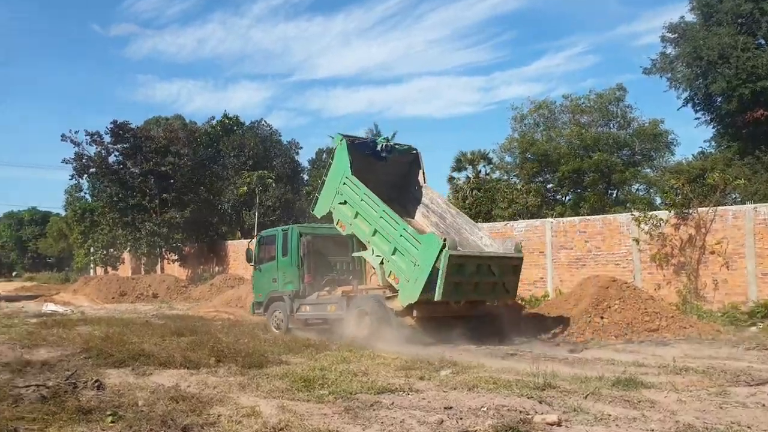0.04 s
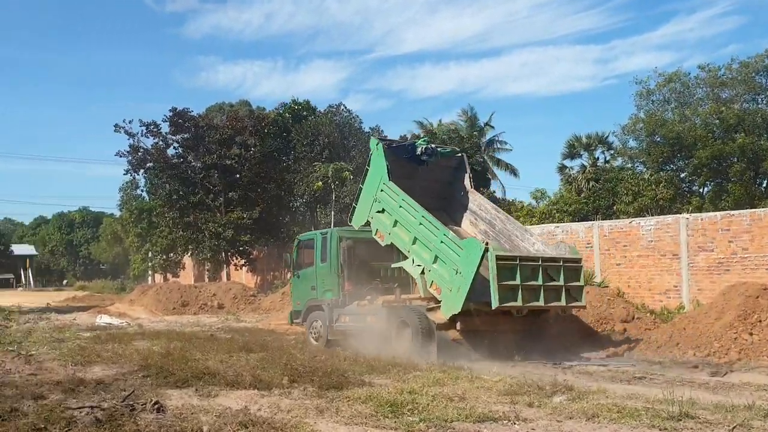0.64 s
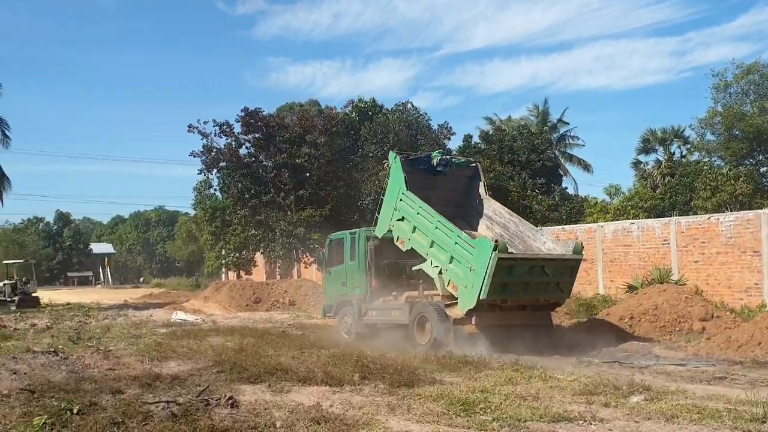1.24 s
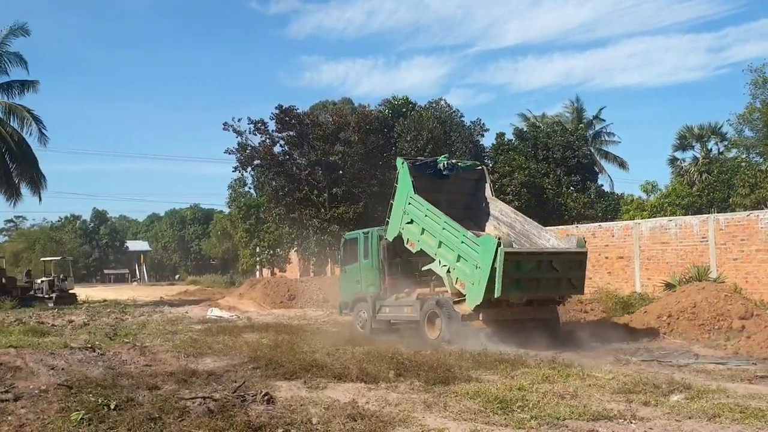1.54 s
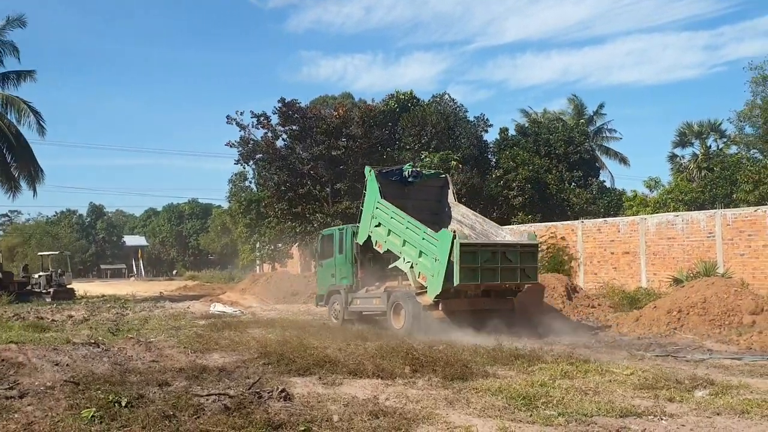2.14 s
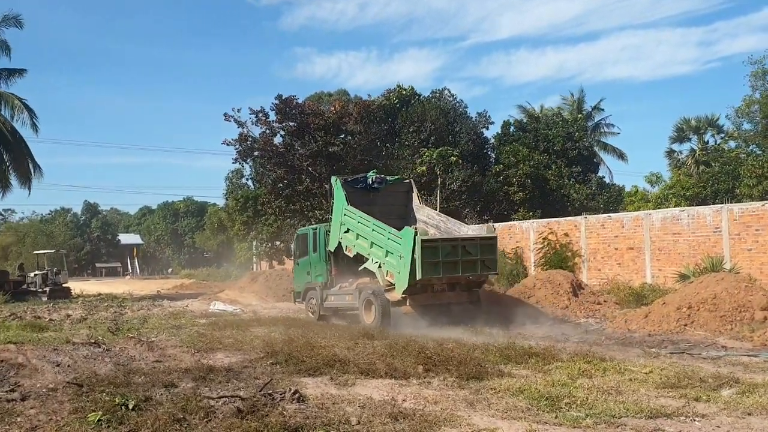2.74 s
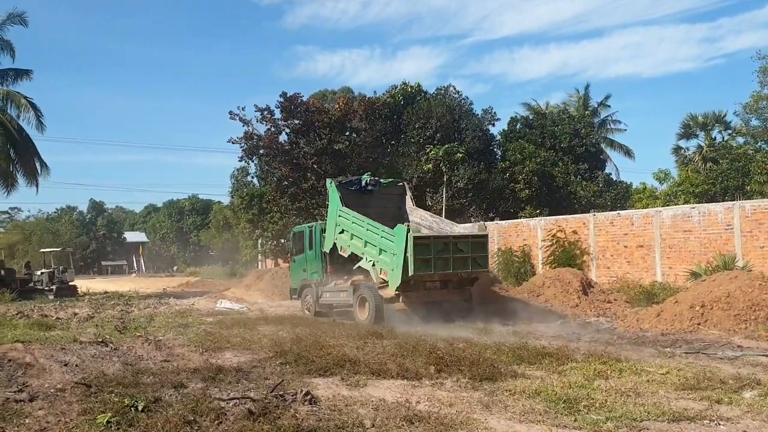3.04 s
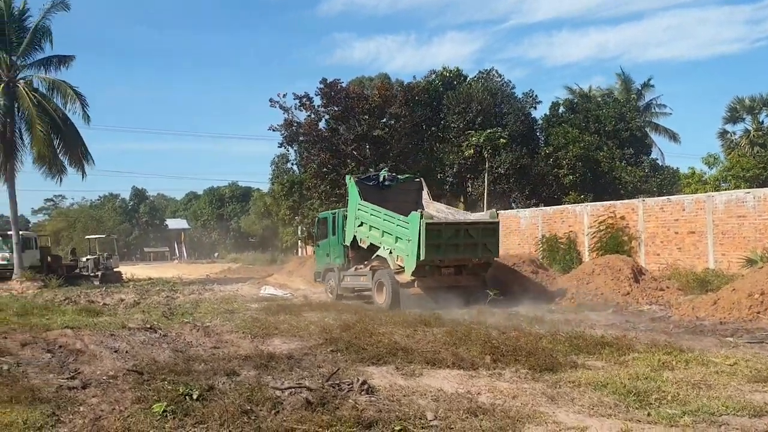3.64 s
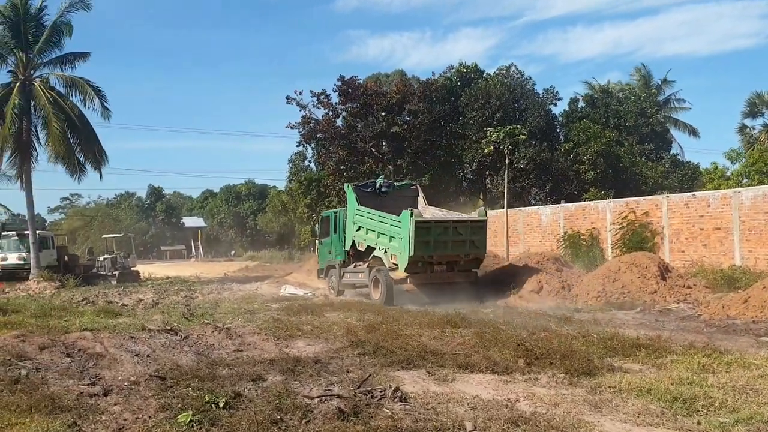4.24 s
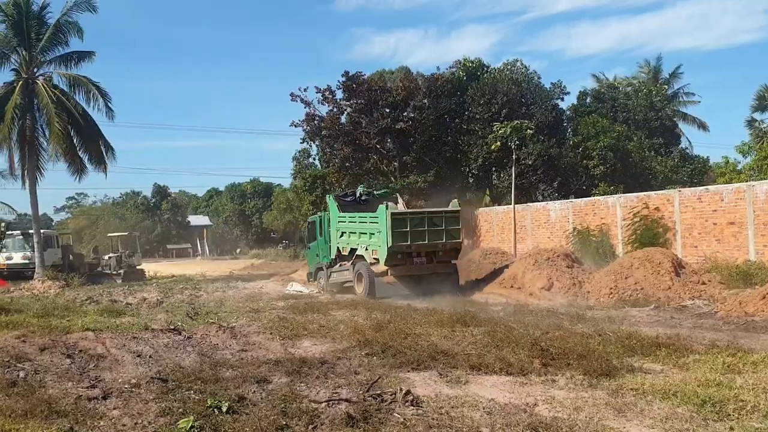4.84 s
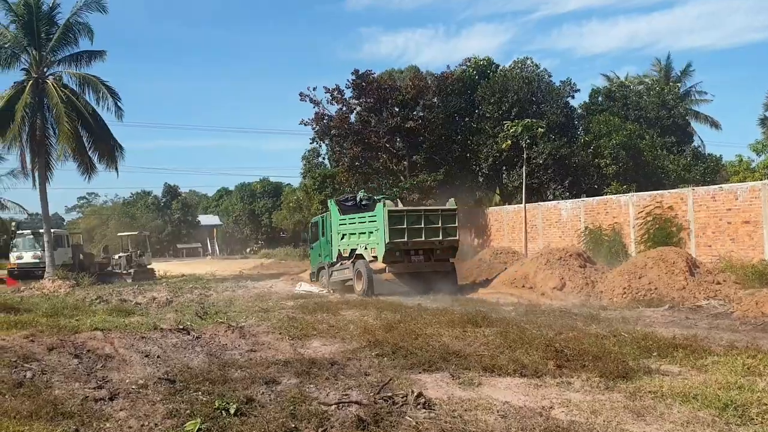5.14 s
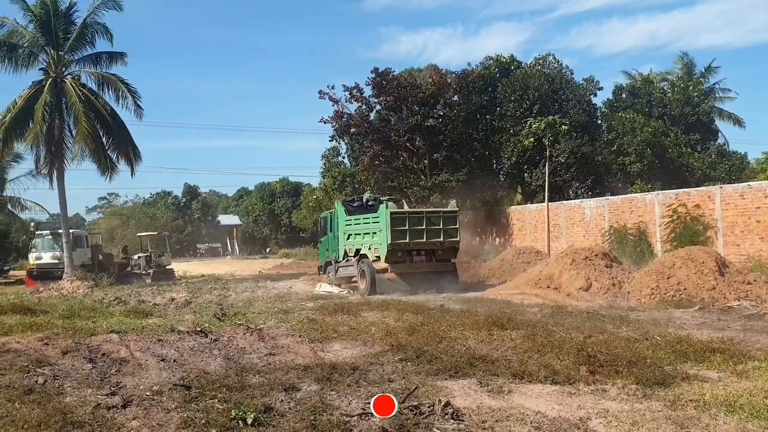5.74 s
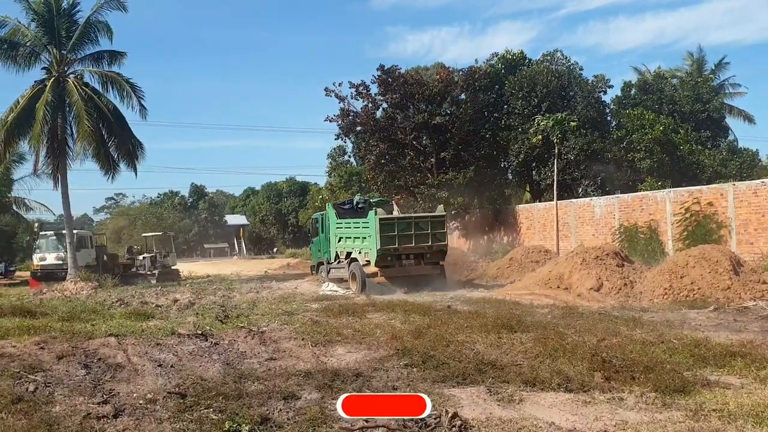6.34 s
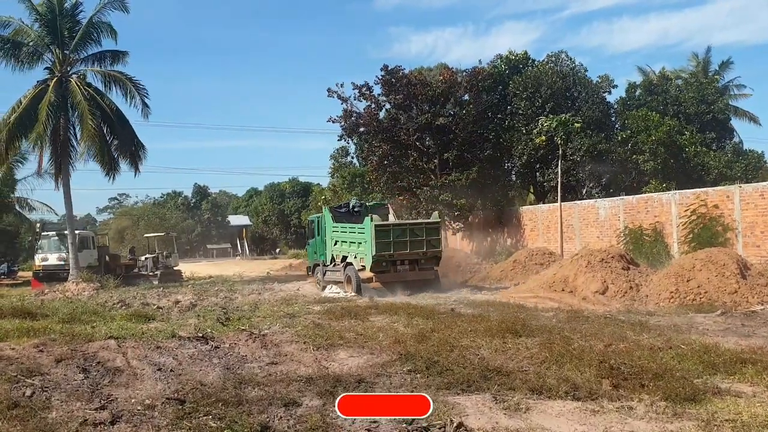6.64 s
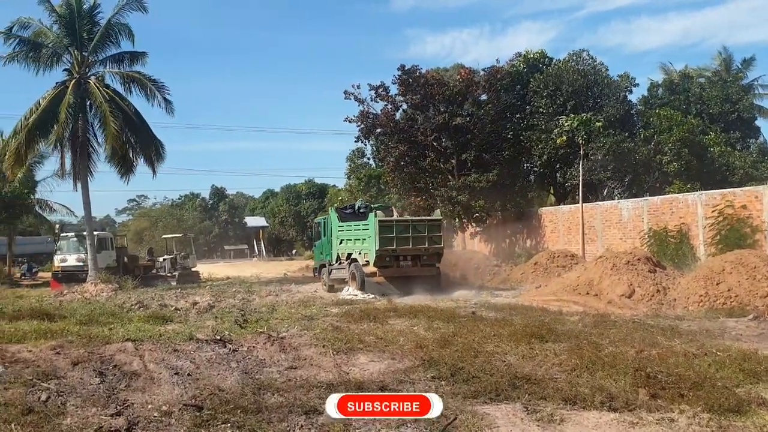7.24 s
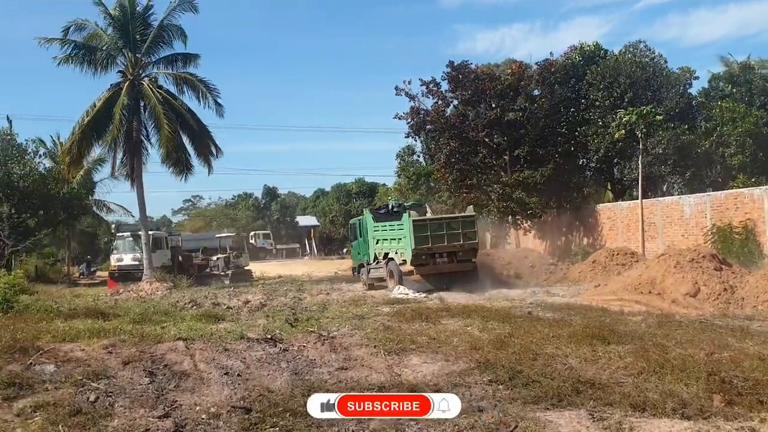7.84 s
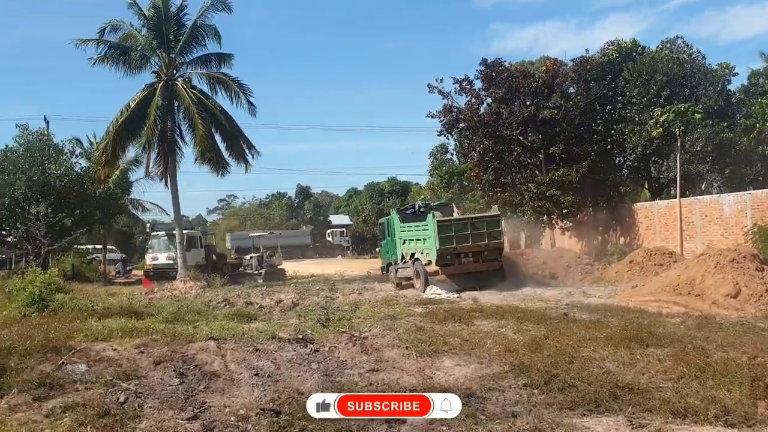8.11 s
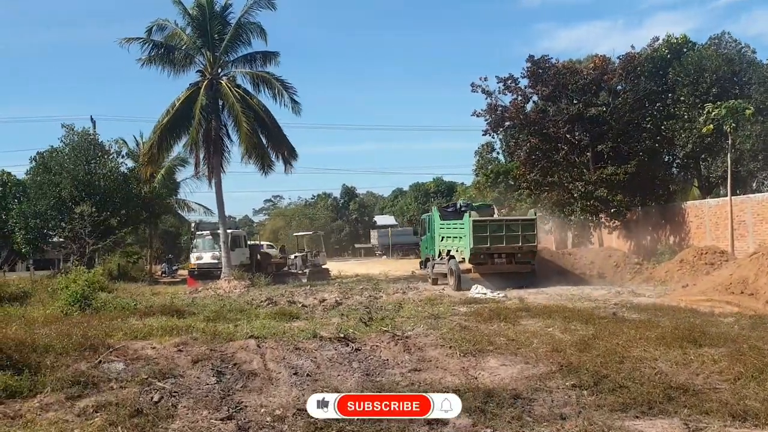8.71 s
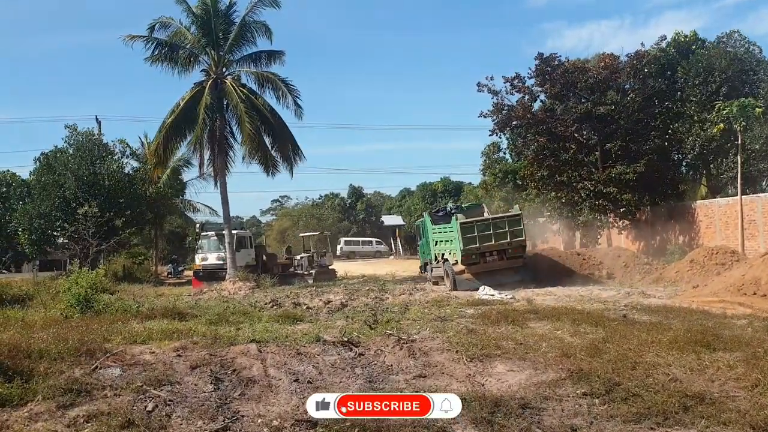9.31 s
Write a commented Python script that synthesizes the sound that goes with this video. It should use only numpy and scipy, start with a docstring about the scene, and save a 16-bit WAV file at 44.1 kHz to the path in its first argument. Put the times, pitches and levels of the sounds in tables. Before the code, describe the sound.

Heavy metal bangs ring out across an open yard as a dump truck's swinging tailgate strikes its bed, over a rumbling diesel and a soft hiss of sliding sand. The bangs come closer together and weaken as the gate settles, its hinges scraping briefly. Sharper, irregular clanks follow while the truck drives on. The sound sits a little right of the microphone, with a light echo.

```python
"""Dump truck tailgate slams

A dump truck jerks over rough ground with its bed raised, and the hanging steel tailgate slams against
the bed. The last sand slides out; as the bed comes down the gate bounces shut, its pins scrape, and it
clanks on its hooks at the bumps. The diesel pulls away, and a brick wall and trees answer the gate."""
import sys
import numpy as np
from scipy import signal
from scipy.fft import rfft, irfft, next_fast_len
from scipy.io import wavfile
from scipy.ndimage import uniform_filter1d, map_coordinates

SR = 44100
rng = np.random.default_rng(int(sys.argv[2]) if len(sys.argv) > 2 else 0)


def output_pcm(signal):
    """Save a mono or channel-first signal as 16-bit PCM at the path in sys.argv[1].

    Samples are clipped to [-1, 1] before scaling.
    """
    pcm = np.clip(np.atleast_2d(signal).T, -1, 1) * 32767
    wavfile.write(sys.argv[1], SR, np.round(pcm).astype(np.int16))


N = 413216

# stereo spread of the steel, and of the yard and truck noise: (frequency [Hz], side over mid [dB])
STEEL_WIDTH = [(60, -13.5), (300, -18.5), (700, -16), (1300, -5.5), (2400, -4.5), (4400, -4), (8000, 1),
               (15000, 0)]
AIR_WIDTH = [(30, 3), (100, -14), (300, -10.5), (1000, -4), (3000, -2.5), (12000, -1)]
# tone of the yard's tail: (frequency [Hz], relative level [dB])
YARD_COLOUR = [(40, -4), (150, 5.5), (600, -10.5), (1500, 1), (4000, -3), (12000, 10.5)]
# length of that tail: (frequency [Hz], t60 [s])
YARD_DECAY = [(80, 1.1), (500, 1.85), (1500, 0.58), (4000, 0.79), (12000, 0.34)]
# engine speed: (time [s], firing rate [Hz])
ENGINE_SPEED = [(0, 71), (1.1, 83), (2.4, 68.4), (3.2, 73.4), (4.2, 67), (5.8, 62.6), (6.15, 68), (6.7, 65),
                (7.1, 63), (7.8, 65.4), (9.37, 63)]
# how hard the truck pulls: (time [s], effort [dB])
EFFORT = [(0, 1.5), (1.0, -17), (2.0, -9), (3.3, -10.5), (4.2, -5.5), (5.6, -4.5), (6.35, -1), (7.1, -5),
          (8.1, 4), (9.37, -2.5)]
# exhaust, engine block, gears and pump: (multiple of the firing rate, relative level [dB])
EXHAUST_THROB = [(1, -13), (1.5, 7.5), (2, 3.5), (2.5, -28), (3, -20)]
BLOCK_DRONE = [(4, -1.5), (4.5, -15.5), (6, -21)]
GEAR_WHINE = [(8, -2), (16, -9.5), (23, -11)]
# noise colours of chassis, diesel, sand and air hiss, hinge pin: (frequency [Hz], relative density [dB])
RUMBLE_COLOUR = [(20, -28), (45, -1.5), (65, 7), (110, -2), (200, -0.5), (300, -10), (500, -28),
                 (1000, -48.5)]
CLATTER_COLOUR = [(150, 4.5), (380, 3), (700, 0.5), (1100, -6), (1600, -8), (2100, -9.5), (2600, -13),
                  (3400, -20.5), (5000, -23.5), (7200, -24.5), (9300, -31), (11500, -28), (15500, -55)]
HISS_COLOUR = [(400, -30), (750, 7), (1050, 12.5), (1500, 7), (2100, 2), (2650, 3.5), (3300, -3.5),
               (4200, -3.5), (5300, -8.5), (7300, -4), (9300, -14), (11500, -8.5), (15500, -13.5)]
PIN_COLOUR = [(2000, -24), (3100, 1), (3520, 7), (3950, -10), (5500, -24), (6700, -6), (7800, -37),
              (12000, -42)]
# sand hiss fades out by 5.4 s, then a faint background air hiss rises: (time [s], level [dB])
HISS_LEVEL = [(0, -50.5), (.9, -50.5), (1.3, -47), (1.9, -49), (2.05, -54.5), (3.3, -59.5), (4.2, -58.5),
              (5.4, -75), (9.37, -58)]
# dry hinge pins scrape as the gate settles: (time [s], level [dB], length [s])
SCRAPES = [(5.553, -45, .036), (5.693, -42, .022), (5.743, -43, .018)]
# clear ring of gate on bed, and of hooks and gate frame: (frequency [Hz], relative level [dB], t60 [s])
BED_MODES = [(88, -2, .3), (158, 1, .38), (240, -1.5, .35), (398, 0, .55), (440, -7, .45), (518, -1, .5),
             (623, -3, .5), (667, 1, .52), (868, -9, .45), (959, -6, .45), (1086, -11, .45),
             (1191, -11, .45), (1237, -13, .4), (1277, -12, .4), (1369, -13, .4), (1420, -12, .45),
             (1606, -12, .45), (1727, -15, .4), (1914, -13, .4), (2096, -13, .4), (2631, -15, .35),
             (2952, -15, .35), (3347, -17, .3), (3499, -17, .3), (4182, -18, .3)]
HOOK_MODES = [(198.4, -1.5, 0.65), (316, 0, 0.67), (530, -3.5, 0.88), (611, 0.5, 0.56), (686, 6, 0.32),
              (905, 1, 0.47), (998, 7, 0.26), (1090, 8, 0.21), (1200, 2.5, 0.075), (1370, 6.5, 0.12),
              (1434, 5.5, 0.12), (2024, -5.5, 0.36), (2270, 3, 0.12), (2605, 3, 0.29), (2643, 10, 0.092),
              (2910, -27, 0.15), (3135, 3, 0.086), (3300, -2.5, 0.094), (3960, 1, 0.072), (4710, -2, 0.1),
              (6100, -10, 0.15), (7000, -38, 0.2), (9995, -39, 0.17)]
# the wash of dense plate modes behind each ring: (frequency [Hz], relative density [dB])
BED_WASH = [(18, -48), (30, -32), (86, -0.5), (157, -5.5), (319, -5), (394, -6), (461, -6.5), (666, -3),
            (822, -9), (937, -6), (1130, -11), (4080, -20), (5040, -26), (14400, -39.5), (16000, -47)]
HOOK_WASH = [(30, -17), (80, 6.5), (300, -6.5), (700, 1.5), (1400, 0.5), (2100, -0.5), (2650, 2.5),
             (3800, -1.5), (5300, -9), (8000, -11), (9300, -22), (10800, -13), (13000, -23.5), (16000, -31)]
# decay of the wash, before a blow's sustain scales it: (frequency [Hz], t60 [s])
STEEL_DECAY = [(60, 1), (200, 0.39), (600, 0.78), (1500, 0.38), (3500, 0.24), (8000, 0.29), (15000, 0.14)]
# where the boom, panel, frame and edge bands meet: (frequency [Hz])
CROSSOVERS = [250, 760, 2200]
# a row for each of those bands: (level at strength 0 [dB], slope [dB per dB of strength])
CLANK_RESPONSE = [(-36.5, 0.98), (-35.5, 1), (-35.5, 0.87), (-29.5, 1)]
SLAM_RESPONSE = [(-22, 0.42), (-20.5, 1), (-25.5, 0.87), (-30.5, 1.21)]
# the loose gate knocks on its hooks and hinges: (time [s], strength [dB], contact [s])
CLANKS = [(2.131, -33, 0.0026), (5.192, -7.5, .016), (5.38, -10, 0.0063), (5.518, -17, 0.0069),
          (5.698, -12.5, 0.034), (5.744, -12.5, 0.0071), (5.846, -20, .016), (6.012, -11, 0.013),
          (6.229, -9.5, 0.042), (6.582, -10, 0.021), (6.824, -4, 0.019), (7.238, 0.5, 0.03),
          (8.029, 2, 0.025), (8.642, -24, 0.019), (8.793, 5, 0.032)]
# gate hits bed; landing askew adds clang: (time [s], strength [dB], clang [dB], contact [s])
SLAMS = [(-0.08, -0.5, 5.5, 0.01), (0.711, -38, -2, 0.045), (1.304, -4, 9, 0.044), (2.507, 7, 0.5, 0.023),
         (3.47, -0.5, 1.5, 0.029), (4.306, 0, 1, 0.026), (4.879, 3, .5, 0.025), (5.192, -2, -1, 0.031),
         (5.38, -10, -3.5, .008), (5.518, -13.5, -4, 0.011), (5.6, -22.5, -2, 0.013)]


def amp(db):
    """Decibels to gain."""
    return 10 ** (np.asarray(db) / 20)


def unit(x):
    """Scale to rms 1."""
    return x / np.sqrt(np.mean(x ** 2) + 1e-20)


def along(points, hz):
    """Read (frequency, value) points on a log axis."""
    freqs, values = np.transpose(points)
    return np.interp(np.log(hz + 1), np.log(freqs + 1), values)


def automation(points):
    """Draw (time, value) points out to one value a sample."""
    return np.interp(np.arange(N) / SR, *np.transpose(points))


def follow(drive_db, level_db, slope):
    """A level in dB that rides its drive at the given slope."""
    return level_db + slope * drive_db


def wobble(rate, size=N):
    """A smooth random curve, rate knots a second."""
    knots = rng.standard_normal(int(size * rate / SR) + 4)
    coarse = np.arange(0, size, 32)
    return np.interp(np.arange(size), coarse, map_coordinates(knots, [coarse * rate / SR]))


def filtered(x, response):
    """EQ x with a gain that depends on frequency."""
    size = x.shape[-1]
    padded = next_fast_len(size + 4096)
    return irfft(rfft(x, padded) * response(np.fft.rfftfreq(padded, 1 / SR)), padded)[..., :size]


def noise(colour, width, size=N):
    """Coloured noise as (mid, side), the mid at rms 1."""
    spread = lambda hz: np.array([np.ones_like(hz), amp(along(width, hz))])
    pair = filtered(rng.standard_normal((2, size)), lambda hz: amp(along(colour, hz)) * spread(hz))
    return pair / np.std(pair[0])


def dying(x, decay, hold):
    """After the hold time each frequency fades at its own speed."""
    hz, t, spectrum = signal.stft(x, SR, nperseg=256)
    fade = amp(-60 * np.maximum(t - hold, 0) / along(decay, hz)[:, None])
    return signal.istft(spectrum * fade, SR, nperseg=256)[1][:, :x.shape[-1]]


def add(track, time, sound):
    """Mix a sound in at a time that may lie before the start."""
    start = round(time * SR)
    part = sound[:, max(-start, 0):N - start]
    track[:, max(start, 0):][:, :part.shape[1]] += part


def steel_comb(depth_db, spacing_hz):
    """The fine, ragged EQ of a steel body's many close high resonances."""
    knots_hz = np.cumsum(spacing_hz * (1 + np.arange(700) / 300))
    peaks = np.clip(rng.standard_normal(len(knots_hz)), -2, 1.5)
    gain = amp(depth_db * peaks * np.minimum(knots_hz / 3500, 1))
    gain /= np.sqrt(uniform_filter1d(gain ** 2, size=12))
    return lambda hz: np.interp(hz, knots_hz, gain)


def yard(x, wet_db, bloom_s):
    """Wall, earth heaps and trees scatter a late, diffuse answer."""
    size = int(1.4 * SR)
    tail = dying(noise(YARD_COLOUR, AIR_WIDTH, size), YARD_DECAY, hold=0)
    tail *= 1 - np.exp(-(np.arange(size) / SR / bloom_s) ** 2)
    hz = np.fft.rfftfreq(size, 1 / SR)
    body_gain = np.sqrt(np.mean(abs(rfft(tail[0])[hz < 1000]) ** 2))
    return amp(wet_db) * signal.fftconvolve(x[:1], tail / body_gain, axes=1)[:, :N]


def sand_and_air_hiss():
    """Sand hisses down the steel bed and fades out; then a faint background air hiss rises."""
    return amp(automation(HISS_LEVEL) + 0.52 * wobble(5.66)) * noise(HISS_COLOUR, AIR_WIDTH)


def chassis_rumble(effort_db, landing_s=5.32, shudder_s=0.62):
    """The chassis jolts over rough ground and shudders as the bed settles on it."""
    jolts = unit(amp(2.8 * wobble(16)))
    rolling = amp(follow(effort_db, level_db=-40.5, slope=.95))
    shudder = amp(-44) * np.exp(-((np.arange(N) / SR - landing_s) / shudder_s) ** 2)
    return (rolling + shudder) * jolts * noise(RUMBLE_COLOUR, AIR_WIDTH)


def diesel_clatter(firing_phase, effort_db):
    """The diesel's noisy edge swells once a firing and grows under load."""
    level_db = follow(effort_db, level_db=-47.5, slope=0.59) + 0.76 * wobble(9)
    pulse = 1 + 0.31 * np.sin(firing_phase)
    return amp(level_db) * pulse * noise(CLATTER_COLOUR, AIR_WIDTH)


def diesel_tones(firing_phase, effort_db):
    """The exhaust throbs throughout; block drone and gear whine come forward under load."""
    def stack(orders):
        """Uneven firings shake the level and phase of every order."""
        return unit(sum(amp(db + 4.6 * wobble(24)) * np.sin(order * firing_phase + 0.49 * wobble(30))
                        for order, db in orders))

    throb = amp(follow(effort_db, level_db=-55.5, slope=-0.13)) * stack(EXHAUST_THROB)
    drone = amp(follow(effort_db, level_db=-44, slope=1.47)) * stack(BLOCK_DRONE)
    whine = amp(follow(effort_db, level_db=-54.5, slope=1.04)) * stack(GEAR_WHINE)
    return (throb + drone + whine) * np.array([[1], [-.08]])  # mid, side


def truck():
    """The moving truck: engine and chassis, with clatter and hiss coloured by the steel body."""
    effort_db = automation(EFFORT)
    firing_hz = automation(ENGINE_SPEED) * (1 + 0.00513 * wobble(14))
    firing_phase = 2 * np.pi * np.cumsum(firing_hz) / SR
    engine = diesel_tones(firing_phase, effort_db)
    rumble = chassis_rumble(effort_db)
    body_comb = steel_comb(depth_db=3, spacing_hz=25)
    grit = diesel_clatter(firing_phase, effort_db) + sand_and_air_hiss()
    return engine + rumble + filtered(grit, body_comb)


def hinges():
    """Each slip of a pin is a short, rough scrape in the pin's resonance."""
    track = np.zeros((2, N))
    for time, db, length in SCRAPES:
        size = int(length * SR)
        scrape = noise(PIN_COLOUR, STEEL_WIDTH, SR // 2)[:, :size]
        add(track, time, amp(db) * np.hanning(size) * scrape)
    return track


def steel_ring(modes, t, hold, scatter_db):
    """Clear modes ring out; the point of contact shifts each blow, and so does each mode's share."""
    hz, db, t60 = np.transpose(modes)[:, :, None]
    share, detune, phase, pan = rng.standard_normal((4, len(modes), 1))
    gains = amp(db + scatter_db * share)
    fade = amp(-60 * np.maximum(t - hold, 0) / t60)
    partials = np.sin(2 * np.pi * (hz * (1 + .004 * detune) * t + phase))
    partials *= gains * fade / np.linalg.norm(gains)
    side = partials * pan * amp(along(STEEL_WIDTH, hz))
    return np.array([partials.sum(0), side.sum(0)])


def balance_bands(hit, levels_db):
    """Set the boom, panel, frame and edge bands to their levels over a hit's first 60 ms."""
    below = [filtered(hit, lambda hz: 1 / (1 + (hz / corner) ** 12)) for corner in CROSSOVERS]
    bands = np.diff([0 * hit, *below, hit], axis=0)
    head = int(.06 * SR)
    return sum(amp(db) * band / np.std(band[0, :head]) for db, band in zip(levels_db, bands))


def blow(modes, wash_colour, comb, levels_db, hold, ring_db, attack_s, scatter_db, brighten, sustain,
         crack_db):
    """One steel impact: held through the contact, then clear modes and a chattering wash die away."""
    size = int(.55 * SR)
    t = np.arange(size) / SR
    ring = steel_ring(modes, t, hold, scatter_db)
    # a harder contact reaches further into the treble
    shelf = [(4000, 0.018), (14000, brighten * (levels_db[-1] + 29.5))]
    wash = filtered(noise(wash_colour, STEEL_WIDTH, size), lambda hz: comb(hz) * amp(along(shelf, hz)))
    wash = dying(wash, np.multiply(STEEL_DECAY, [1, sustain]), hold)
    chatter = amp(1.5 * wobble(200, size) * np.exp(-t / .15))
    crack = amp(crack_db * np.exp(-t / 0.023))  # lifts or softens the first touch
    steel = wash * chatter * crack + amp(ring_db) * ring
    return balance_bands(steel, levels_db) * (1 - np.exp(-t / attack_s))


def tailgate():
    """The swinging gate booms against the whole bed; once closed it clanks, lighter, on its hooks."""
    track = np.zeros((2, N))
    bed_comb = steel_comb(depth_db=4.5, spacing_hz=24)
    hook_comb = steel_comb(depth_db=4.5, spacing_hz=26)
    for time, strength_db, clang_db, contact in SLAMS:
        boom, panel, frame, edge = (follow(strength_db, *band) for band in SLAM_RESPONSE)
        levels_db = [boom, panel, frame + clang_db, edge + clang_db]
        slam = blow(BED_MODES, BED_WASH, bed_comb, levels_db, hold=contact, ring_db=-0.5,
                    attack_s=0.00079, scatter_db=2.5, brighten=0.48, sustain=1.062, crack_db=1.0)
        add(track, time, slam)
    for time, strength_db, contact in CLANKS:
        levels_db = [follow(strength_db, *band) for band in CLANK_RESPONSE]
        clank = blow(HOOK_MODES, HOOK_WASH, hook_comb, levels_db, hold=contact, ring_db=4.0,
                     attack_s=0.00059, scatter_db=0.5, brighten=0.47, sustain=0.86, crack_db=-0.5)
        add(track, time, clank)
    return track


def scene():
    """The gate and its echo over the truck, all a little to the right."""
    gate = tailgate() + hinges()
    mid, side = gate + yard(gate, wet_db=-16, bloom_s=0.1) + truck()
    return np.array([mid + side, mid - side]) * amp([[-.55], [.55]])


def record(dry):
    """Soft-clip the loudest peaks and cut the top steeply at 15.7 kHz."""
    rounded = dry / (1 + np.abs(dry) ** 6) ** (1 / 6)
    return filtered(rounded, lambda hz: 1 / (1 + (hz / 15700) ** 160))


dry = scene()
out = record(dry)
output_pcm(out)
```